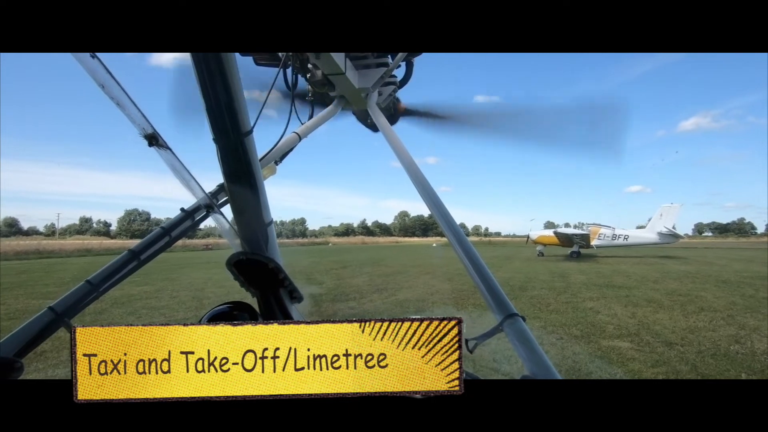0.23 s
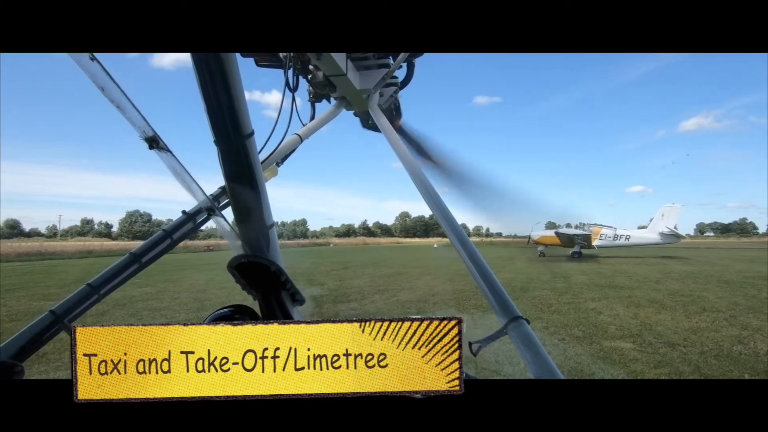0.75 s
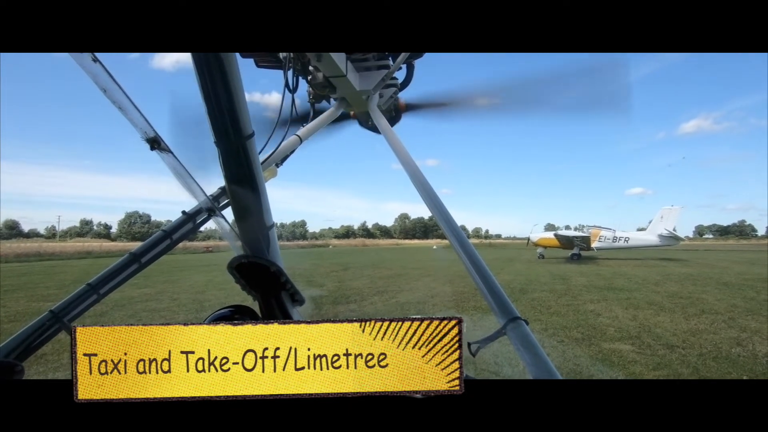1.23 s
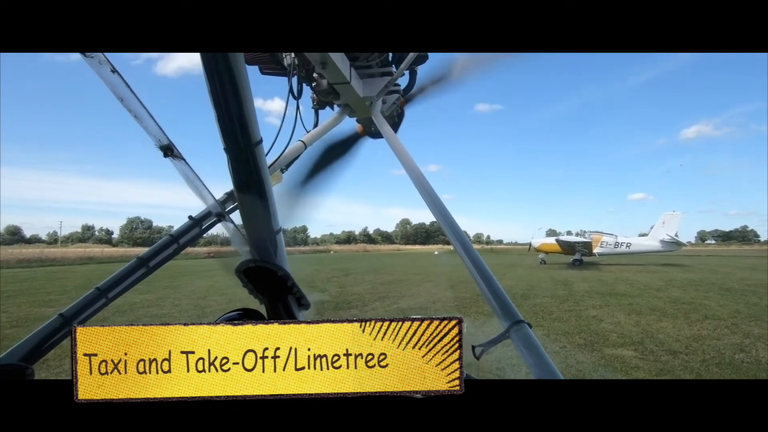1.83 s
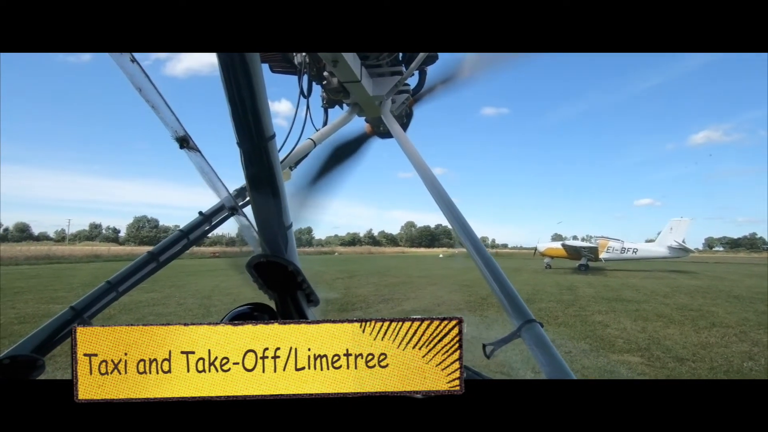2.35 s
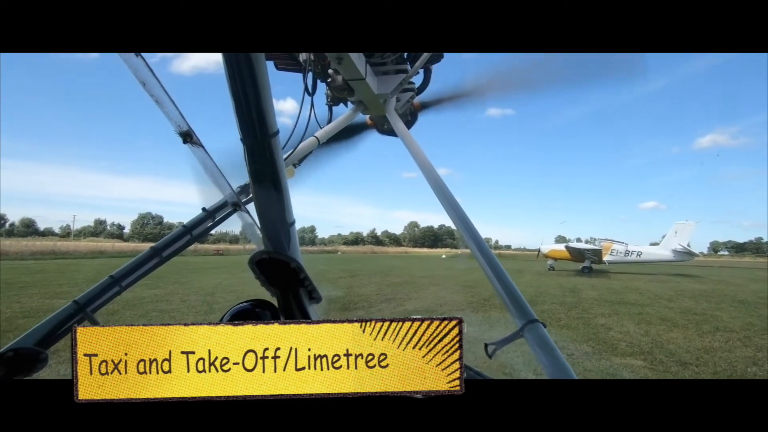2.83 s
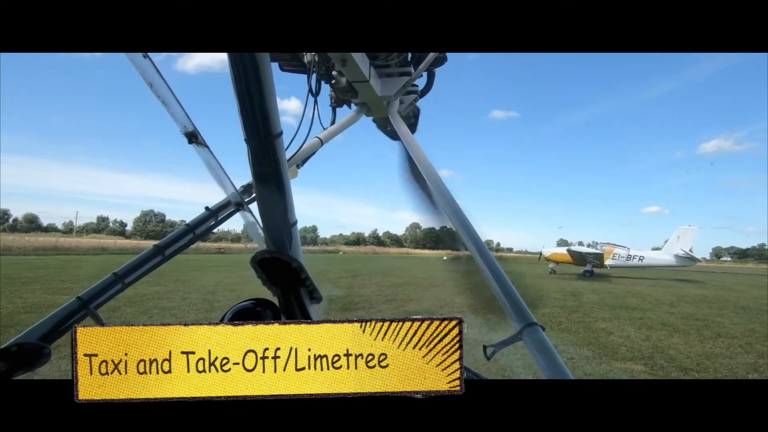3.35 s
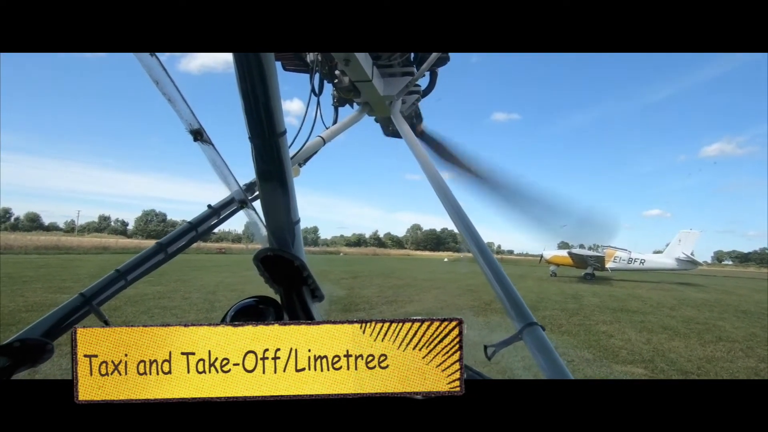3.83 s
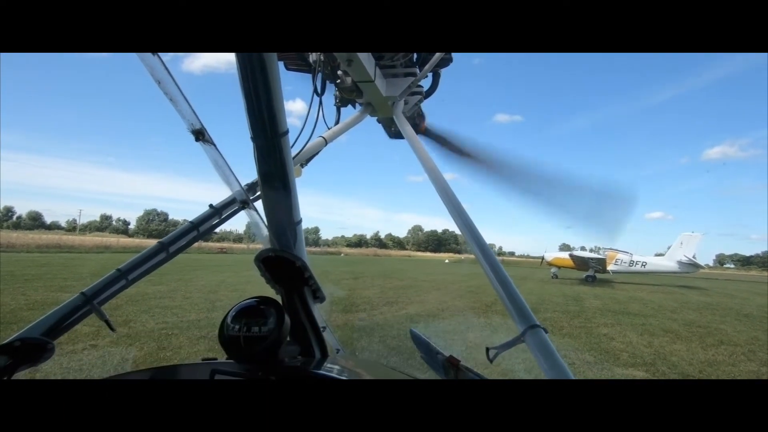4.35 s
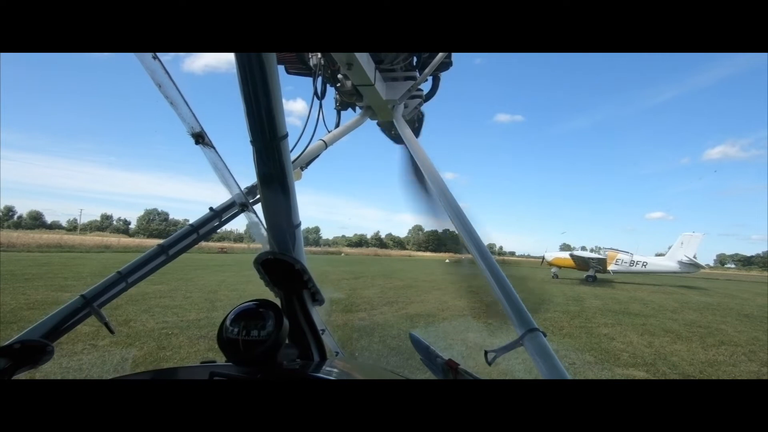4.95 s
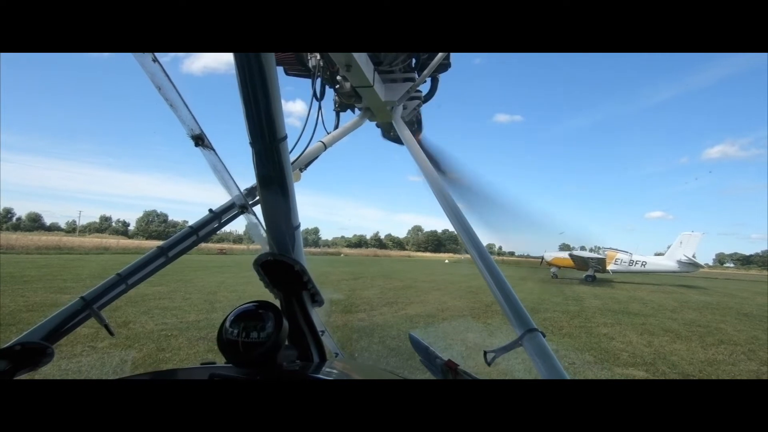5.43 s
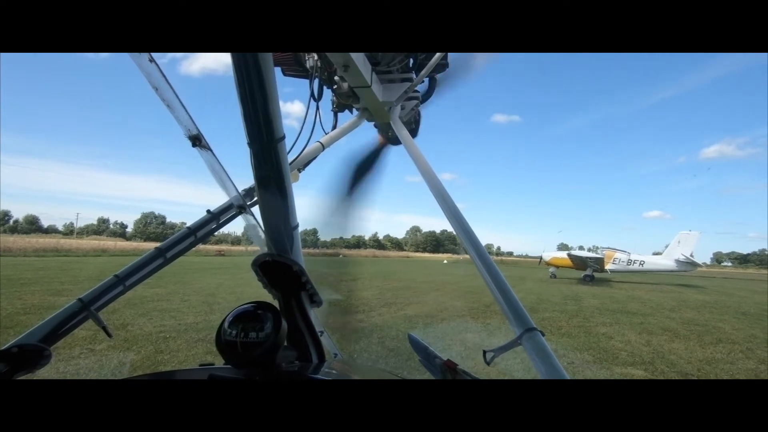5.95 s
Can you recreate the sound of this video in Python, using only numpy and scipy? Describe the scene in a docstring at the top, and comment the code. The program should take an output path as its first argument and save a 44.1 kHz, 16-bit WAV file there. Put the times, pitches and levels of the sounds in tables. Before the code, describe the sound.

A small two-stroke aircraft engine is already idling just overhead, heard close from the seat of an open cockpit. For the first three seconds its low, buzzing drone runs unevenly and sinks slightly, with a few brief misfires around one second. Irregular, ringing metal knocks come from the propeller gears, several a second, from about 0.5 to 3.2 seconds. Then the engine slows markedly, reaching its lowest pitch between 3.7 and 4 seconds, where it shudders and stumbles while the gears and frame rattle hard. From 4 seconds it speeds up again, the pitch rising until about 5.3 seconds as the rattle fades, with a couple of lighter knocks on the way. It holds a faster, smoother, loping idle until the end at about six seconds, with a soft flutter of propeller blades and a faint hiss of air.

```python
"""A microlight's two-cylinder, two-stroke engine idles just above the open cockpit, heard from the seat.
Each firing (one burn of fuel) pushes gas out of the exhaust, and together the firings make a drone.
At first the engine misfires now and then, and the propeller gears knock in the slack between their teeth.
As it slows, it shudders and the gears and frame rattle hard. Then it speeds up and settles into a
smoother, loping idle under the flutter of the propeller blades chopping the air."""
import sys
import numpy as np
from scipy import signal
from scipy.fft import rfft, irfft, next_fast_len
from scipy.io import wavfile
from scipy.ndimage import uniform_filter1d, map_coordinates

SR = 44100
rng = np.random.default_rng(int(sys.argv[2]) if len(sys.argv) > 2 else 0)


def dump(signal):
    """Clip the signal to [-1, 1] and save it as 16-bit WAV at the path in sys.argv[1]."""
    limited = np.clip(np.atleast_2d(signal).T, -1, 1)
    pcm = np.round(limited * 32767).astype(np.int16)
    wavfile.write(sys.argv[1], SR, pcm)


N = 273420


def amp(db):
    """Turn decibels into a number to multiply by."""
    return 10 ** (np.asarray(db) / 20)


def unit(x):
    """Scale a signal to an average (rms) size of 1."""
    return x / np.sqrt(np.mean(x ** 2) + 1e-20)


def curve(rows):
    """Join (seconds, value) points with straight lines, one value per sample."""
    times, values = np.transpose(rows)
    return np.interp(np.arange(N) / SR, times, values)


def wobble(rate):
    """A smooth curve through `rate` random points a second."""
    points = rng.standard_normal(int(N * rate / SR) + 4)
    return map_coordinates(points, [np.arange(N) * rate / SR])


def filtered(x, response, table):
    """Pass x through a filter: `colour` or `ringing`, set by a table."""
    size = 2 * next_fast_len(N)
    hz = np.fft.rfftfreq(size, 1 / SR)
    return irfft(rfft(x, size) * response(table, hz), size)[:N]


def colour(points, hz):
    """A filter that turns each frequency up or down, following (Hz, dB) points."""
    point_hz, db = np.transpose(points)
    gain = amp(np.interp(np.log(hz + 1), np.log(point_hz), db))
    # folding the cepstrum keeps the filter from sounding before it is struck
    cepstrum = irfft(np.log(gain))
    half = len(cepstrum) // 2
    cepstrum[1:half] *= 2
    cepstrum[half + 1:] = 0
    return np.exp(rfft(cepstrum))


def ringing(modes, hz):
    """A filter that rings at each listed pitch; narrower ones ring longer."""
    return sum(amp(db) * 1j * hz * width / (pitch * pitch - hz * hz + 1j * hz * width)
               for pitch, width, db in modes)


def strokes(cycles, scatter_db):
    """One click per whole cycle, each of its own size."""
    starts = np.flatnonzero(np.diff(np.floor(cycles)) > 0)
    clicks = np.zeros(N)
    clicks[starts] = amp(scatter_db * np.clip(rng.standard_normal(len(starts)), -2, 2))
    return clicks


def fading(clicks, life):
    """Give each click a tail that falls to about a third in `life` seconds."""
    return signal.lfilter([1], [1, -np.exp(-1 / (life * SR))], clicks)


def tone(cycles, multiple, rough_db, drift, lag=0.2573):
    """An unsteady tone at a multiple of the firing rate; the pipe delays the higher ones."""
    phase = 2 * np.pi * multiple * cycles - lag * multiple ** 2 + drift * wobble(24)
    return unit(amp(rough_db * wobble(40)) * np.cos(phase))


def throttle(speed, full_pull=30):
    """Throttle from 0 to 1: wide open when the firing rate climbs by `full_pull` Hz a second."""
    pull = np.clip(np.gradient(speed) * SR / full_pull, 0, 1)
    return uniform_filter1d(pull, size=SR // 8)


# A "level rule" lists: level in dB when the engine labours, level in dB when it runs freely, changeover
# speed and its width in firings per second, dB added to the labouring level at full throttle.
def strength(speed, rule):
    """How strong one part of the sound is, sliding between its two levels as the speed changes."""
    labouring_db, free_db, changeover, width, pull_db = rule
    freedom = .5 + .5 * np.tanh((speed - changeover) / (2 * width))
    return amp((1 - freedom) * (labouring_db + pull_db * throttle(speed)) + freedom * free_db)


# The firing tone, then its 2nd, 3rd and 4th harmonics. Each row: a level rule.
DRONE_RULES = [(-18.5, -17.5, 70.5, 0.73, -0.5), (-17, -37, 80, 1.68, 1.5), (-27.5, -39.5, 81.7, 1.1, 4.5),
               (-25, -51.5, 77.4, 1.58, 4.5)]
# The uneven beat, at the crankshaft's turning rate and three times that. Each row: a level rule.
LOPE_RULES = [(-43, -29.5, 76, 2.2, -2.5), (-39.5, -23.5, 82.5, 1.6, -0.5)]
# The slow throb: one level rule.
THROB_RULE = (-47, -25, 80.5, 2.5, 2)
# The exhaust's rasp. Each row: multiple of the firing rate, relative level in dB.
RASP_TONES = [(5, -3), (6, -9.5), (7, -4.5), (8, 0), (10, -2.5), (12, 1)]
# How the exhaust pipe shapes sound. Each row: frequency in Hz, boost or cut in dB.
PIPE_COLOUR = [(15, -14), (35, -4.5), (60, 1.5), (110, 3.5), (190, 2), (250, -0.5), (315, -1), (385, -12),
               (490, -10), (570, -17.5), (680, -16.5), (850, -23.5), (1130, -21), (1300, -32),
               (1850, -32.5), (2700, -48.5), (6000, -72.5)]


def exhaust_note(speed, cycles):
    """Regular firings make a buzzing drone; the two cylinders fire unequally, so it lopes."""
    first, second, third, fourth = (strength(speed, rule) for rule in DRONE_RULES)
    drone = first * tone(cycles, 0.99, rough_db=0.36, drift=.04)
    drone += second * tone(cycles, 2, rough_db=0.77, drift=0.061)
    buzz = third * tone(cycles, 3, rough_db=2, drift=.16)
    buzz += fourth * tone(cycles, 4, rough_db=2, drift=.22)
    overtones = sum(amp(db) * tone(cycles, k, rough_db=3, drift=.12 * k) for k, db in RASP_TONES)
    rasp = amp(2) * fourth * filtered(overtones, colour, PIPE_COLOUR)
    once, thrice = (strength(speed, rule) for rule in LOPE_RULES)
    lope = once * tone(cycles, 1 / 2, rough_db=1, drift=.15)
    lope += thrice * tone(cycles, 3 / 2, rough_db=1, drift=.15, lag=.9)
    # this beats against the firing tone about once in four firings
    throb = strength(speed, THROB_RULE) * tone(cycles, .735, rough_db=1.5, drift=.5)
    return misfires() * (drone + buzz + rasp) + lope + throb


# The low and high parts of the gas noise: one level rule each. The rumble's width is negative,
# which swaps its two levels, so it is a little stronger at low speed.
RUMBLE_RULE = (-25, -23, 74.5, -1.2, -1)
BARK_RULE = (-19.5, -28.5, 81, 2, 0.5)


def burning_gas(speed, cycles, split_hz=190):
    """No two firings burn alike: each leaves its own thump and puff of gas in the silencer."""
    thumps = unit(strokes(cycles, scatter_db=4.5) * rng.uniform(-0.9, 1, N))
    puffs = unit(fading(strokes(cycles, scatter_db=3.5), life=0.028) * rng.standard_normal(N))
    gas = unit(filtered(.5 * thumps + puffs, colour, PIPE_COLOUR))
    rumble = signal.sosfilt(signal.butter(3, split_hz, "low", fs=SR, output="sos"), gas)
    bark = signal.sosfilt(signal.butter(3, split_hz, "high", fs=SR, output="sos"), gas)
    return strength(speed, RUMBLE_RULE) * rumble + strength(speed, BARK_RULE) * bark


def contacts(spiky_db):
    """Noise of many tiny metal hits, some harder than others."""
    return unit(rng.standard_normal(N) * amp(spiky_db * wobble(2500)))


# The dry clack of metal on metal. Each row: frequency in Hz, boost or cut in dB.
CLACK_COLOUR = [(200, -24), (500, 19.5), (800, 11), (1300, 2), (1900, -3.5), (2300, -7), (3600, -29),
                (5000, -17), (6700, -16), (7500, -25.5), (8400, -22), (15500, -24)]
# The ring of the gearbox and frame tubes. Each row: pitch in Hz, width in Hz, relative level in dB.
METAL_RINGS = [(1034, 60, 7), (1165, 40, 3), (1324, 30, 2), (1593, 28, 6), (1700, 40, -1), (1790, 45, 6),
               (1997, 32, 7), (2142, 28, -1), (2249, 30, -4), (2558, 55, 2), (2689, 26, -1), (2877, 36, -3),
               (3020, 40, -9), (3255, 30, -3), (3550, 90, -15), (3920, 60, -13), (4290, 100, -16),
               (5250, 42, -12), (5630, 90, -16), (6510, 55, -10), (6800, 70, -14), (8130, 100, -16),
               (8660, 50, -19)]


def struck_metal(force, ring_db, spiky_db):
    """Metal parts clack together and set the gearbox and frame tubes ringing."""
    clack = filtered(force * contacts(spiky_db), colour, CLACK_COLOUR)
    ring = filtered(force * contacts(spiky_db), ringing, METAL_RINGS)
    return clack + amp(ring_db) * ring


# The force behind the gears' light rattle and their hard chatter at low speed: one level rule each.
RATTLE_RULE = (-46.5, -63.5, 78, 2.3, 4)
CHATTER_RULE = (-38, -70, 71.5, 2.37, 0.5)
# The engine's rocking. Each row: multiple of the firing rate, relative level in dB.
ROCKING_TONES = [(2.5, 2), (3.5, 1.5), (4.5, -2), (5.5, -4.5)]
# The frame's low booms. Each row: pitch in Hz, width in Hz, relative level in dB.
FRAME_BOOMS = [(209.5, 25, -2), (322, 150, -8)]


def rattle_and_shudder(speed, cycles):
    """Each firing throws the gear teeth across their slack, and the engine shudders on its mounts."""
    force = strength(speed, RATTLE_RULE) + strength(speed, CHATTER_RULE)
    jolts = unit(fading(strokes(cycles, scatter_db=2), life=.007))
    shake = unit(.9 + jolts)
    rocking = sum(amp(db) * tone(cycles, k, rough_db=2, drift=.22) for k, db in ROCKING_TONES)
    # the frame booms when a rocking tone meets one of its own pitches
    shudder = filtered(rocking, ringing, FRAME_BOOMS)
    rattle = struck_metal(amp(8) * force * shake, ring_db=1, spiky_db=0.5)
    return rattle + amp(14) * force * shudder


# The blades' swish and the air's hiss. Each row: frequency in Hz, boost or cut in dB.
SWISH_COLOUR = [(250, -18), (450, 1.5), (680, 9.5), (900, -5), (1150, -7.5), (1300, -11), (1900, -17),
                (2600, -30.5), (6000, -37.5)]
HISS_COLOUR = [(300, -2.5), (2000, 3.5), (3200, -2.5), (5000, 2.5), (6600, -1), (7500, -10.5), (9800, -8.5),
               (12900, -3.5), (15500, -3)]
# How loud the moving air is. Each row: time in seconds, level in dB.
HISS_LEVELS = [(0, -55.5), (4.4, -60.5), (4.75, -61), (5.1, -60.5), (5.6, -55), (6.2, -54.5)]


def propeller(speed, cycles):
    """Two blades, geared down 3 to 1, chop the hissing air, louder as their tips speed up."""
    passes = strokes(cycles / 3, scatter_db=1.2)
    gusts = unit(fading(fading(passes, life=.003), life=.007))
    chop = unit(.85 + gusts)
    tip_gain = (speed / 90) ** 1.5
    swish = unit(filtered(chop * rng.standard_normal(N), colour, SWISH_COLOUR))
    hiss = unit(filtered(rng.standard_normal(N), colour, HISS_COLOUR))
    return amp(-38.5) * tip_gain * swish + amp(curve(HISS_LEVELS)) * hiss


# The loud gear knocks. Each row: time in seconds, relative level in dB.
LOUD_KNOCKS = [(0.4643, -32.5), (0.792, -38.5), (0.8495, -38.5), (0.8953, -31), (0.954, -33), (1.01, -32.5),
               (1.114, -25.5), (1.2443, -35.5), (1.2852, -32), (1.348, -35.5), (1.4054, -36), (1.4586, -33),
               (1.6162, -35.5), (1.6537, -28.5), (1.721, -32), (1.852, -28), (1.9091, -27), (1.9574, -34.5),
               (1.9884, -32.5), (2.119, -30.5), (2.2789, -35.5), (2.3311, -31.5), (2.5182, -33.5),
               (2.5588, -33.5), (2.6656, -31), (2.7057, -31), (2.9227, -35), (3.1136, -33.5),
               (3.241, -33.5), (4.5856, -38), (4.8539, -38)]
# The extra body of a heavy knock. Each row: frequency in Hz, boost or cut in dB.
KNOCK_COLOUR = [(400, -4.5), (1300, 2), (3200, 1), (4500, -3.5), (8500, 0), (14000, -6)]
TAP_SPEED, TAP_RANGE = 76.2, 1.3  # light taps fill in around this speed, in firings per second


def gear_knocks(speed, cycles, life=0.013, rise=0.0037, firings_per_tap=5):
    """A weak firing lets the propeller run ahead of the gears, which clack back in a short burst."""
    unsettled = np.exp(-.5 * ((speed - TAP_SPEED) / TAP_RANGE) ** 2)
    taps = strokes(cycles / firings_per_tap + .2 * wobble(8), scatter_db=2.2)
    blows = amp(-40) * unsettled * taps
    for seconds, db in LOUD_KNOCKS:
        blows[round((seconds - rise) * SR)] += amp(db)
    # taking away a quicker tail softens the start of each blow
    force = fading(blows, life) - fading(blows, life * rise / (life + rise))
    clacks = struck_metal(amp(4.5) * force, ring_db=2, spiky_db=1.4)
    return filtered(clacks, colour, KNOCK_COLOUR)


# Failed firings. Each row: time in seconds, share of the exhaust note lost from 0 to 1.
MISFIRE_GAPS = [(0.599, 0.2), (.803, 0.6), (1.153, .45), (1.255, 0.3), (3.903, 0.68), (3.94, .45),
                (4.25, 0.4)]


def misfires(half_gap_s=0.0066):
    """Strength of the exhaust note: 1, with a brief dip whenever the fuel fails to burn."""
    t = np.arange(N) / SR
    return 1 - sum(lost * np.exp(-.5 * ((t - when) / half_gap_s) ** 2) for when, lost in MISFIRE_GAPS)


# The engine's speed. Each row: time in seconds, firings per second.
ENGINE_SPEED = [(0, 79.5), (.5, 79), (.95, 75.5), (1.25, 75.6), (1.6, 77), (1.85, 75.1), (2.14, 75),
                (3.08, 74.4), (3.35, 66.6), (3.49, 68), (3.66, 60.2), (4.01, 59.8), (4.12, 64.1),
                (4.39, 71.7), (4.71, 81.5), (5.33, 91.4), (5.72, 91), (6.2, 89.3)]


def scene():
    """Add up the sounds, all driven by the same engine speed."""
    speed = curve(ENGINE_SPEED)
    cycles = np.cumsum(speed) / SR  # firings so far
    sources = (exhaust_note, burning_gas, rattle_and_shudder, gear_knocks, propeller)
    return sum(source(speed, cycles) for source in sources)[None]


# A hollow in the high treble. Each row: frequency in Hz, boost or cut in dB.
TREBLE_DIP = [(7000, 0), (8600, -4), (10000, -14.5), (11400, -22.5), (12800, -7.5), (15500, -15.5)]


def record(dry, top_hz=15650):
    """Fade both ends quickly, hollow out the high treble and cut off the very top."""
    fade = np.minimum(np.arange(N) / (.003 * SR), 1)
    heard = filtered(dry[0] * fade * fade[::-1], colour, TREBLE_DIP)
    top_cut = signal.ellip(12, .1, 90, top_hz, fs=SR, output="sos")
    return signal.sosfilt(top_cut, heard)[None]


dry = scene()
out = record(dry)
dump(out)
```